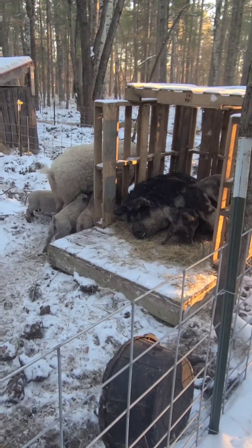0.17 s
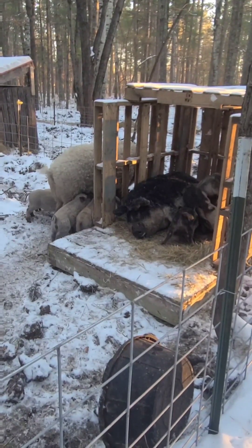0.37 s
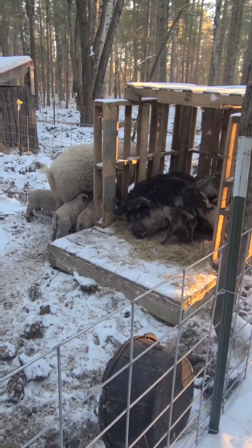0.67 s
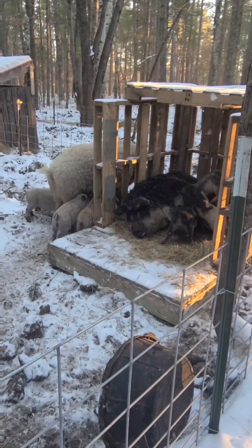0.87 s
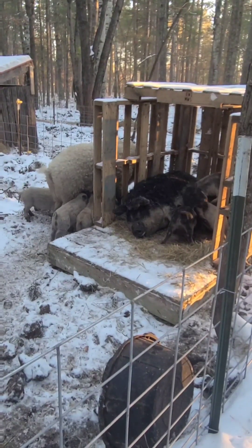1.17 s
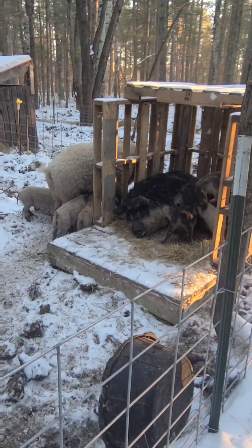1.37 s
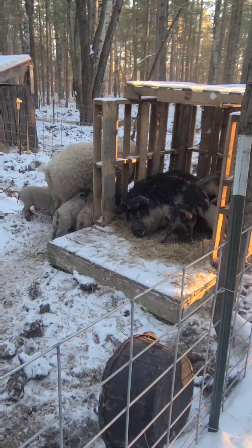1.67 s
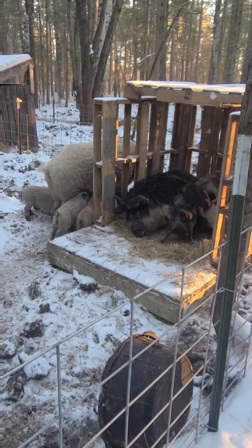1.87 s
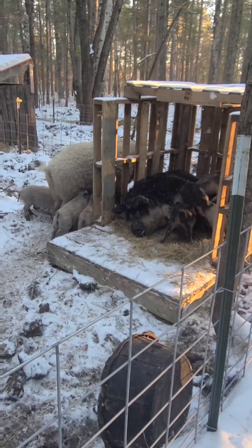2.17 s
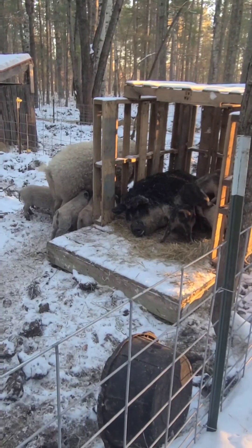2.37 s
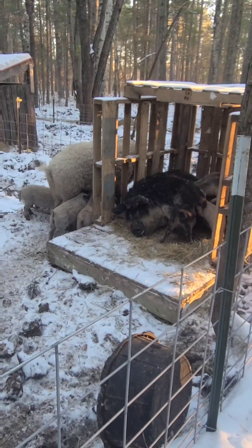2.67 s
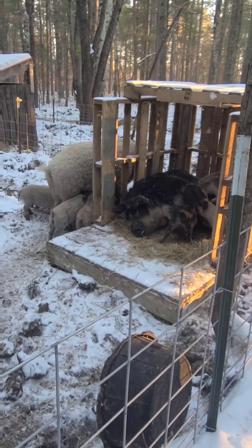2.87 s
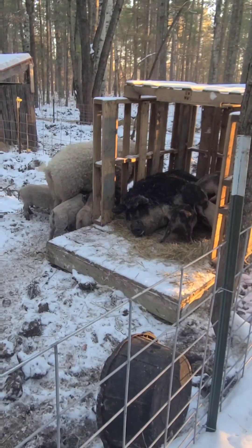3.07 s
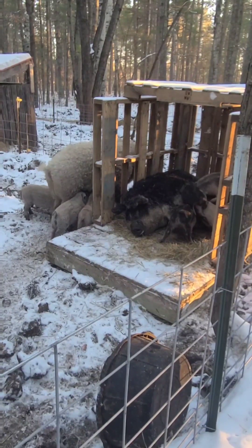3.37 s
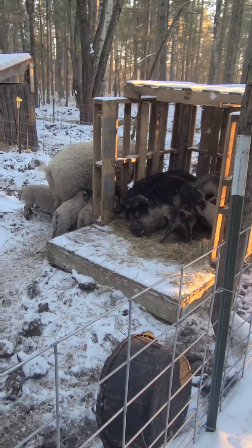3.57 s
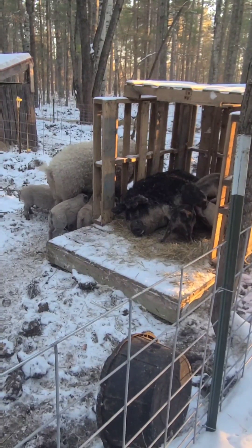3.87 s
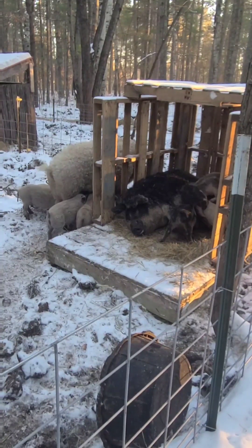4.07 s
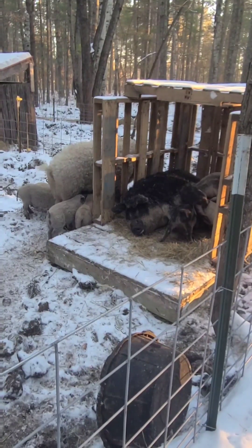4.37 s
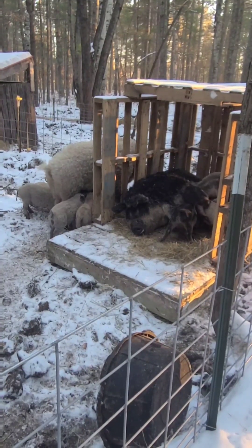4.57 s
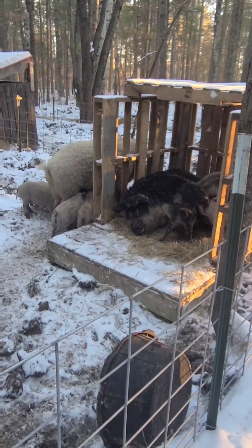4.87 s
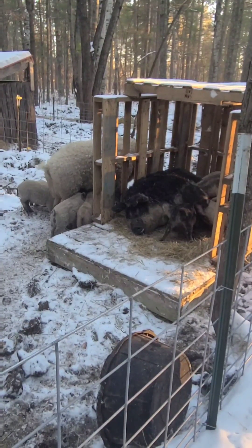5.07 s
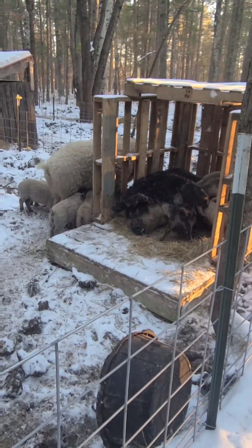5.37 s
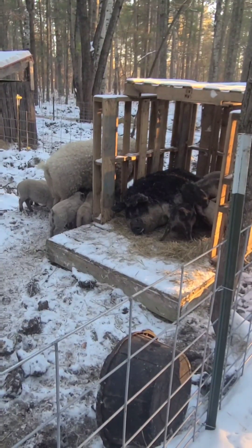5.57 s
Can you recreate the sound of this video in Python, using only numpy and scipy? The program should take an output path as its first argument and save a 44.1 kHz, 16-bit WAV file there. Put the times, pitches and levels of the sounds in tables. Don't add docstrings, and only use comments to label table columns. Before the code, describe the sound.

Nine short, hollow grunts from a sow come evenly, beginning just before one second, each a rapid rattle of three to five flaps. Between them are soft straw shuffles, wet clicks, airy piglet snorts, a few tiny squeaks and whimpers, and another sow's fainter grunts. Open air, hardly any echo, slight low rumble, stereo microphone a little way off.

```python
import sys
import numpy as np
from scipy import signal
from scipy.io import wavfile

SR = 44100
rng = np.random.default_rng(int(sys.argv[2]) if len(sys.argv) > 2 else 0)


def rack_gain(trim_db):
    fader = np.asarray(trim_db, float)
    return 10 ** (fader / 20)


def wrap_up_sound(samples):
    columns = np.atleast_2d(samples).T
    tamed = np.clip(columns, -1, 1)
    steps = np.round(tamed * 32767).astype(np.int16)
    wavfile.write(sys.argv[1], SR, steps)


N = 252252

# [t/s, half length/s, level/dB]
STRAW_STIRS = [(.02, 0.041, -51), (.13, 0.061, -51.5), (.43, 0.058, -57), (.74, 0.052, -49),
               (.9, 0.11, -50), (1.1, 0.25, -60), (1.47, 0.15, -53), (1.76, 0.052, -53), (1.92, 0.071, -52),
               (2.3, 0.05, -51), (2.43, 0.098, -52), (2.86, 0.19, -52.5), (2.99, 0.12, -53.5),
               (3.3, 0.11, -51.5), (3.73, 0.11, -52), (4.15, 0.17, -57), (4.53, 0.074, -51),
               (4.78, 0.098, -53.5), (5.17, 0.14, -55.5), (5.43, 0.12, -58)]
# [f/Hz, level/dB per Hz]
STRAW_COLOUR = [(150, -10.5), (300, -4), (500, -8.5), (700, -3.5), (1200, -9.5), (1600, -17), (2500, -23.5),
                (3500, -32.5)]
# [t/s, half length/s, snort level/dB, fine hiss level/dB]
NOSE_BLOWS = [(.07, 0.054, -64.5, -75.5), (.43, 0.06, -69, -75.5), (.86, 0.02, -63, -81),
              (1.03, 0.11, -67.5, -74.5), (1.48, 0.093, -76, -81), (2.3, .07, -61.5, -75),
              (2.69, 0.069, -64, -71.5), (3.07, 0.15, -61, -73.5), (3.34, 0.12, -65.5, -80),
              (3.82, .05, -77, -81), (4.15, 0.27, -75, -75.5), (4.6, 0.12, -59.5, -79.5),
              (5.15, .08, -68.5, -87.5), (5.46, 0.18, -66, -75)]
# [f/Hz, level/dB per Hz]
SNORT_COLOUR = [(1500, -11), (2500, -0.5), (4700, -4), (5800, -7.5), (7200, -7), (8200, -8), (9000, -33)]
# [f/Hz, level/dB per Hz]
HISS_COLOUR = [(8000, -17), (9200, -1.5), (10200, -4.5), (11500, -3.5), (13000, 3.5), (14600, -3.5),
               (15300, -3)]
# [f/Hz, width/Hz, level/dB]
WHEEZE_BANDS = [(4650, 220, -76.5), (6960, 420, -79), (9230, 130, -85), (11400, 330, -88.5)]
# [t/s, half length/s, level/dB]
BODY_HEAVES = [(.01, 0.037, -45), (.73, 0.027, -48.5), (.91, 0.11, -55.5), (1.38, 0.095, -50.5),
               (1.8, 0.13, -53), (2.24, .04, -51), (3.39, 0.089, -54), (3.8, 0.047, -41.5),
               (4.25, .1, -54.5), (4.7, 0.2, -55), (5.27, 0.098, -64), (5.51, 0.046, -61), (5.71, .03, -40)]
# [f/Hz, level/dB per Hz]
RUMBLE_COLOUR = [(15, -40), (25, -3), (64, 4), (96, 3), (119, 3), (156, -6.5), (250, -19.5), (320, -36),
                 (550, -120)]
# [f/Hz, likeness/0 to 1]
LEFT_RIGHT_LIKENESS = [(60, 0.91), (300, 0.83), (1200, 0.46), (3000, 0.011), (14000, 0.02)]
# [delay/s, level/dB]
SHELTER_ECHOES = [(.0037, -20), (.0068, -15.5), (0.01, -17.5), (.021, -23), (.034, -26)]

# [t/s, length/s, peak level/dB, chest relative level/dB]
FAR_SOW_GRUNTS = [(0.043, 0.11, -44, 8), (.71, .001, -55, 5), (1.335, 0.098, -42, 5.5),
                  (1.793, 0.11, -42, -2), (2.024, .001, -52.5, 0), (2.284, 0.071, -47, 3),
                  (3.018, 0.11, -40, 0.5), (3.652, 0.14, -40.5, 1), (4.185, 0.11, -44.5, 6),
                  (4.384, .001, -53, -1.5), (4.715, 0.097, -44, 5.5), (4.942, 0.00076, -59, 9.5),
                  (5.204, .107, -47, 4.5), (5.492, 0.00085, -51.5, 4.5)]
FAR_GAP_S = .033
FAR_ARCH_DB, FAR_SAG_DB, FAR_CHEST_RISE_DB = 6, 1, 1.5
FAR_SNOUT_HZ, FAR_SPREAD_HZ, FAR_MOUTH_DB, FAR_MOUTH_HZ = 1172, 45, -29, 2820

# [f/Hz, level/dB, t60/s]
SNOUT_MODES = [(810, -17, 0.047), (1016, -12, 0.045), (1194, -12, 0.045), (1381, -14.5, 0.032)]
# [f/Hz, level/dB, t60/s]
CHEST_MODES = [(69.5, 4.5, 0.092), (105.5, 2.5, 0.064), (164, -16, 0.092)]
# [f/Hz, level/dB, t60/s]
THROAT_MODES = [(407.4, 8, 0.051), (332.7, 0.5, 0.06)]
# [f/Hz, level/dB, t60/s]
MOUTH_MODES = [(2960, -10.5, 0.027), (3250, -9, 0.027)]
# [f/Hz, level/dB, t60/s]
LIP_MODES = [(1660, -1.5, 0.005), (1790, 2.5, 0.036)]
# [f/Hz, width/Hz, level/dB]
SPIT_COLOUR = [(2720, 980, 8.5), (3420, 990, -19)]
# [f/Hz, width/Hz, level/dB]
TICK_COLOUR = [(4430, 890, 1), (4760, 550, 2), (6060, 760, -3.5)]

# [t/s, peak level/dB, f/Hz, crackle relative level/dB]
STRAW_SNAPS = [(0.199, -53, 680, -7), (0.357, -47.5, 1106, -3), (0.45, -50, 810, -20),
               (0.681, -48.5, 856, -23), (0.918, -39, 1186, -26), (0.999, -40, 660, -28),
               (1.132, -51, 1050, -10), (1.764, -47, 800, -6), (1.772, -41.5, 804, -22),
               (1.939, -40.5, 836, -19), (1.969, -40, 616, -26), (2.357, -42, 594, -15),
               (2.372, -41.5, 670, -5), (2.398, -39.5, 1145, -10), (2.414, -43, 730, -13),
               (2.602, -50.5, 805, -21), (2.632, -46.5, 970, -1), (2.803, -41.5, 1194, -12),
               (2.896, -41.5, 1050, -19), (3.629, -47, 824, -8), (3.794, -47, 825, -18),
               (4.365, -54, 1220, -21), (4.769, -42, 640, -22)]

# [first full slap t/s, gap to next slap/s, first full slap to last flap/s,
# opening flap level/dB, closing flap level/dB]
NEAR_SOW_GRUNTS = [
    (0.798, 0.029, 0.062, -18, -26.5),
    (1.552, .0277, .0575, -18.5, -19),
    (2.133, .0233, .0535, -19.5, -16.5),
    (2.722, 0.029, .062, -26, -27.5),
    (3.326, 0.03, 0.064, -18, -41),
    (3.956, 0.03, 0.06, -19.5, -19.5),
    (4.468, .025, 0.078, -19, -29),
    (5.047, 0.029, 0.06, -18.5, -31),
    (5.596, 0.027, .091, -23, -28),
]
# [usual level/dB, snout f/Hz, upper mouth relative level/dB,
# upper mouth f/Hz, chest relative level/dB]
FLAP_PLACES = [
    (-20, 1170, -15.5, 2990, -19.5),
    (-12, 1092, -22.5, 2865, -18.5),
    (-11.5, 1130, -24.5, 2970, -18.5),
    (-12.5, 1170, -24.5, 3080, -15.5),
    (-24, 1190, -19, 3180, -7.5),
]
OPENING_LEAD_S, EXTRA_GAP_S, LONG_GRUNT_S = .030, .0315, .075
BUILD_UP = 0.5
USUAL_GAP_S, SNOUT_HZ_PER_S = 0.02767, 13500
CHEST_HOLDS, MOUTH_HOLDS = 0.68, 0.14

# [t/s, peak level/dB, f/Hz, t60/s]
TINY_SQUEAKS = [(.802, -51, 5250, .06), (.83, -50, 5150, .05), (.861, -47, 5000, .035),
                (1.514, -31.5, 675, 0.058), (2.784, -45.5, 4870, .04), (1.301, -52, 1660, 0.05),
                (2.372, -42.5, 1860, 0.044), (2.4, -43, 9120, 0.055), (2.635, -58, 9230, 0.18),
                (2.72, -66, 9230, 0.34), (3.79, -64, 9700, .15), (1.93, -51, 325, 0.16),
                (3.634, -51, 326, .08), (3.754, -40, 420, .1), (3.789, -43, 305, 0.12),
                (5.687, -46.5, 5000, .04)]
# [t/s, pitch f/Hz, level/dB]
WHIMPER_CURVES = [
    [(1.52, 664, -38), (1.53, 675, -13), (1.542, 676, -66), (1.545, 688, -48.5)],
    [(3.39, 349, -34), (3.398, 340, -70), (3.428, 317, -45), (3.45, 360, -65)],
    [(4.5, 415.6, -47), (4.512, 400, -86), (4.534, 297, -35.5), (4.566, 266, -45), (4.64, 250, -52)],
]
# [t/s, level/dB]
SNORT_PUFFS = [
    (2.63, -65),
    (2.95, -51),
    (3.03, -65),
    (4.4, -58.5),
    (4.52, -61),
]


def in_time(rows):
    s, *columns = np.transpose(rows)
    return [np.interp(np.arange(N) / SR, s, c, left=c[0], right=c[-1]) for c in columns]


def at_hz(points, hz):
    f, value = np.transpose(points)
    return np.interp(np.log(hz), np.log(f), value)


def drift(rate):
    hop = 40
    r = np.exp(-2 * np.pi * rate * hop / SR)
    noise = rng.standard_normal(N // hop + 2002)
    slow = signal.lfilter([1], [1, -2 * r, r * r], noise)[2000:]
    return np.interp(np.arange(N) / hop, np.arange(len(slow)), slow / slow.std())


def bouts(rows, still_db, axis=2):
    t = np.arange(0, N + 64, 64) / SR
    s, half_s, db = np.array(rows)[:, [0, 1, axis], None].transpose(1, 0, 2)
    swells = rack_gain(2 * db) * np.exp(-((t - s) / half_s) ** 2)
    power = rack_gain(2 * still_db) + swells.sum(axis=0)
    return np.interp(np.arange(N) / SR, t, 10 * np.log10(power))


def banded_noise(spectrum, patchy_db, grain_db):
    white = rng.standard_normal((2, 2, N)) * rack_gain(grain_db * drift(90))
    lowest, highest = spectrum[0][0], spectrum[-1][0]
    edges = lowest * 2 ** np.arange(0, np.log2(highest / lowest) + .3, 1 / 3)
    out, together = 0, drift(5.4)
    for k, (low, high) in enumerate(zip(edges, edges[1:])):
        band = signal.butter(2, [low, high], "band", fs=SR, output="sos")
        mid, side = signal.sosfilt(band, white[k % 2])
        hz = np.sqrt(low * high)
        alike = np.clip(at_hz(LEFT_RIGHT_LIKENESS, hz), 0, 1)
        gain = rack_gain(at_hz(spectrum, hz) + patchy_db * (1.16 * together + drift(9.8)))
        out = out + gain * (np.sqrt(1 + alike) * mid + np.sqrt(1 - alike) * side * [[1], [-1]])
    return out / out.std()


def rings(modes, rise_s, luck, lead=0.):
    hz, db, t60 = np.array(modes).T[:, :, None]
    t = np.arange(round(t60.max() * SR)) / SR
    strength = rack_gain(db + 1.8 * luck[:len(hz), None] - 60 * t / t60)
    phase = 2 * np.pi * hz * (1 + 0.018 * luck[-len(hz):, None]) * t + lead
    swell = (1 - np.exp(-t / rise_s)) ** 2
    return swell * (strength * np.sin(phase)).sum(axis=0)


def spray(strikes, t60, colour):
    fall = rack_gain(-60 / (t60 * SR))
    noise = signal.lfilter([1], [1, -fall], strikes + 1e-18) * rng.standard_normal(N)
    out = 0
    for hz, width_hz, db in colour:
        peak = signal.iirpeak(hz, hz / width_hz, SR)
        once = signal.lfilter(*peak, noise)
        out = out + rack_gain(db) * signal.lfilter(*peak, once)
    return out


def add(track, sound, s):
    i = max(round(s * SR), 0)
    track[i:i + len(sound)] += sound[:N - i]


def shelter(x):
    dull = signal.sosfilt(signal.butter(2, [400, 3500], "band", fs=SR, output="sos"), x)
    out = x.copy()
    for delay, db in SHELTER_ECHOES:
        add(out, rack_gain(db) * dull, delay)
    return out


def placed(x, pan_db, lag):
    late = np.interp(np.arange(N) - lag, np.arange(N), x)
    return np.array([late, x]) * rack_gain(np.array([[pan_db / 2], [-pan_db / 2]]))


def heaving_air():
    level_db = bouts(BODY_HEAVES, still_db=-63.5)
    return rack_gain(level_db + 1.0) * banded_noise(RUMBLE_COLOUR, patchy_db=2.5, grain_db=-1.0)


def wheeze():
    out = 0
    for hz, width_hz, db in WHEEZE_BANDS:
        band = signal.lfilter(*signal.iirpeak(hz, hz / width_hz, SR), rng.standard_normal((2, N)))
        out = out + rack_gain(db + 2.2 * drift(3.0)) * band / band.std()
    return out


def straw():
    level_db = bouts(STRAW_STIRS, still_db=-60)
    return rack_gain(level_db - 0.5) * banded_noise(STRAW_COLOUR, patchy_db=2.0, grain_db=1.0) * rack_gain([[-.7], [.7]])


def nose_blows():
    snort_db = bouts(NOSE_BLOWS, still_db=-71.5)
    hiss_db = bouts(NOSE_BLOWS, still_db=-81, axis=3)
    snort = rack_gain(snort_db + 1.0) * banded_noise(SNORT_COLOUR, patchy_db=1.4, grain_db=1.3) * rack_gain([[.9], [-.9]])
    hiss = rack_gain(hiss_db - 0.5) * banded_noise(HISS_COLOUR, patchy_db=0.6, grain_db=1.0) * rack_gain([[-.7], [.7]])
    return snort + hiss


def far_flaps():
    flaps = []
    for (s, length_s, db, chest_db), luck in zip(FAR_SOW_GRUNTS, rng.standard_normal((len(FAR_SOW_GRUNTS), 8))):
        count = round(length_s / FAR_GAP_S) + 1
        places = np.linspace(-1, 1, count) * (count > 1)
        for k, u in enumerate(places):
            time = s + length_s * (u + 1) / 2
            level_db = db - FAR_ARCH_DB * u ** 2 - FAR_SAG_DB * u
            snout_hz = FAR_SNOUT_HZ + FAR_SPREAD_HZ * luck[k]
            flaps.append((time, level_db, snout_hz, FAR_MOUTH_DB, FAR_MOUTH_HZ, chest_db + FAR_CHEST_RISE_DB * u))
    return flaps


def sow(flaps, full_db, throat_db, snout_t60, opening_db, opening_s):
    snout, chest, throat, mouth, wet = np.zeros((5, N))
    slap_s = .0005
    free = np.arange(12) > 0
    for (s, db, hz, mouth_db, mouth_hz, chest_db), luck in zip(flaps, rng.standard_normal((len(flaps), 4, 12))):
        t60 = snout_t60 * (1150 / hz) ** 0.5 * rack_gain(0.35 * (db - full_db))
        slap = -rack_gain(db - 0.5) * rings([(hz, 0, t60)] + SNOUT_MODES, slap_s, luck[0] * free)
        add(snout, slap, s - .0009)
        add(snout, rack_gain(opening_db) * slap, s - opening_s)
        thump = -rack_gain(db + chest_db + 3.5) * rings(CHEST_MODES, 0.0025, 1.5 * luck[2], lead=0.15)
        add(chest, thump, s - .005)
        add(throat, rack_gain(throat_db + 0.37 * db) * rings(THROAT_MODES, 0.0064, luck[1]), s - .003)
        add(mouth, rack_gain(db + 2.8 * mouth_db + 23.5) * rings(LIP_MODES, slap_s, luck[1]), s - .001)
        upper = rings([(mouth_hz, 0, .02)] + MOUTH_MODES, slap_s, luck[3] * free)
        add(mouth, rack_gain(db + mouth_db + 9.0) * upper, s - .0006)
        add(wet, np.array([rack_gain(db + mouth_db - 7.0)]), s - .0004)
    passage = signal.butter(4, [640, 1465], "band", fs=SR, output="sos")
    snout = shelter(signal.sosfilt(passage, snout + 1e-18))
    mouth = signal.lfilter(*signal.iirnotch(2250, 3.5, SR), mouth + spray(wet, 0.11, SPIT_COLOUR))
    tick = rack_gain(-8.5) * spray(wet, 0.069, TICK_COLOUR)
    return snout, chest, throat, mouth, tick


def snaps():
    out, crackle = np.zeros((2, N))
    for (s, db, hz, crackle_db), luck in zip(STRAW_SNAPS, rng.standard_normal((len(STRAW_SNAPS), 4))):
        add(crackle, np.array([rack_gain(db + crackle_db + 5)]), s)
        add(out, rack_gain(db + 2.5) * rings([(hz, 0, .03), (1.44 * hz, -7, .015)], 0.00029, luck), s)
    return out + spray(crackle, .02, [(1600, 470, 1), (2680, 1600, 3.0), (6500, 3000, -21)])


def near_flaps():
    flaps = []
    for s, gap_s, length_s, opening_db, closing_db in NEAR_SOW_GRUNTS:
        times = [s - OPENING_LEAD_S, s, s + gap_s, s + gap_s + EXTRA_GAP_S, s + length_s]
        surplus = opening_db - FLAP_PLACES[0][0]
        surplus_db = [surplus, BUILD_UP * surplus, 0, 0, closing_db - FLAP_PLACES[-1][0]]
        wider_hz = [0, 0, SNOUT_HZ_PER_S * (gap_s - USUAL_GAP_S), 0, 0]
        for place, (db, hz, mouth_db, mouth_hz, chest_db) in enumerate(FLAP_PLACES):
            if place == 3 and length_s <= LONG_GRUNT_S:
                continue
            more = surplus_db[place]
            flaps.append((times[place], db + more, hz + wider_hz[place], mouth_db - MOUTH_HOLDS * more, mouth_hz,
                          chest_db - CHEST_HOLDS * more))
    return flaps


def squeaks():
    out = np.zeros(N)
    for s, db, hz, t60 in TINY_SQUEAKS:
        add(out, rack_gain(db) * rings([(hz, 0, t60)], 0.00067, np.zeros(1)), s)
    return out


def whimpers():
    out = np.zeros(N)
    t = np.arange(N) / SR
    for rows in WHIMPER_CURVES:
        hz, db = in_time(rows)
        fade_in = np.clip((t - rows[0][0]) / 0.0017, 0, 1)
        fade_out = np.clip((rows[-1][0] - t) / 0.076, 0, 1)
        phase = 2 * np.pi * np.cumsum(hz) / SR
        voice = np.sin(phase) + rack_gain(-20.0) * np.sin(2 * phase)
        out += np.sqrt(2) * rack_gain(db) * fade_in * fade_out * voice
    return out


def puffs():
    strikes = np.zeros(N)
    for s, db in SNORT_PUFFS:
        add(strikes, rack_gain(db) * np.hanning(900) / 450, s)
    colour = [(2480, 2000, -0.5), (5000, 2400, 2.0), (12000, 7800, -14)]
    return np.array([spray(strikes, 1.5, colour) for side in range(2)])


def scene():
    far = sum(sow(far_flaps(), full_db=-42.5, throat_db=-40.0, snout_t60=0.053, opening_db=-20.5, opening_s=0.008))
    snout, chest, throat, mouth, tick = sow(near_flaps(), full_db=-6.0, throat_db=-28, snout_t60=0.041,
                                            opening_db=-18, opening_s=0.004633)
    near = placed(snout, -2.2, -2.5) + placed(chest, -1.8, 3.0) + placed(throat, -5.0, -13.5)
    near += placed(mouth, 1.2, -4.16) + placed(tick, 2.2, -.4)
    piglets = shelter(snaps() + squeaks() + whimpers())
    animals = placed(far, -2.0, -1.8) + near + placed(piglets, -1.1, -1.4)
    return heaving_air() + wheeze() + straw() + nose_blows() + animals + puffs()


def band_limit(x):
    return signal.sosfilt(signal.butter(12, 15270, fs=SR, output="sos"), x)


def record(dry):
    thin = signal.sosfilt(signal.butter(4, 44, "high", fs=SR, output="sos"), dry)
    thin = signal.sosfilt(signal.ellip(10, .5, 60, 15260, fs=SR, output="sos"), thin)
    return band_limit(thin)


dry = scene()
out = record(dry)
wrap_up_sound(out)
```